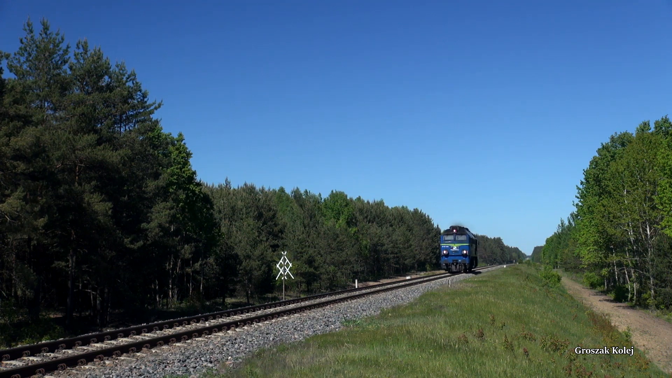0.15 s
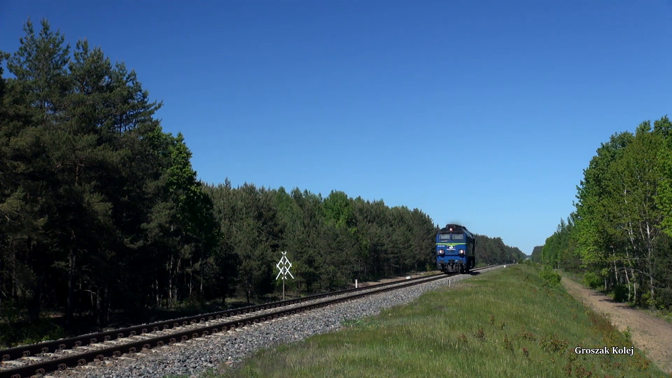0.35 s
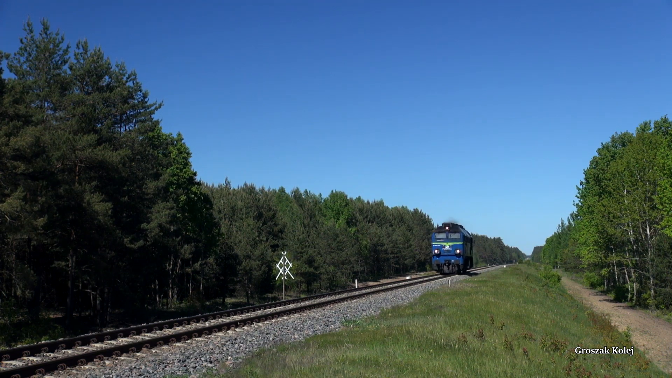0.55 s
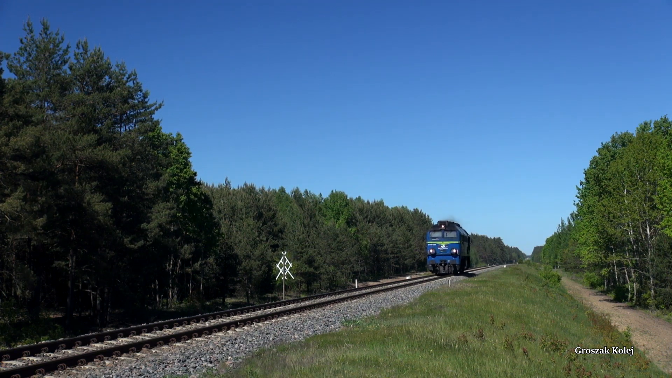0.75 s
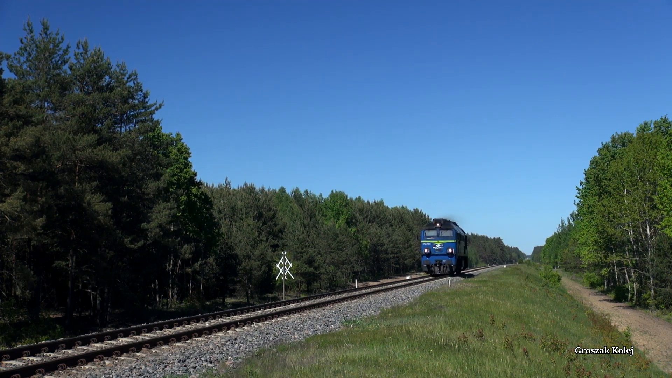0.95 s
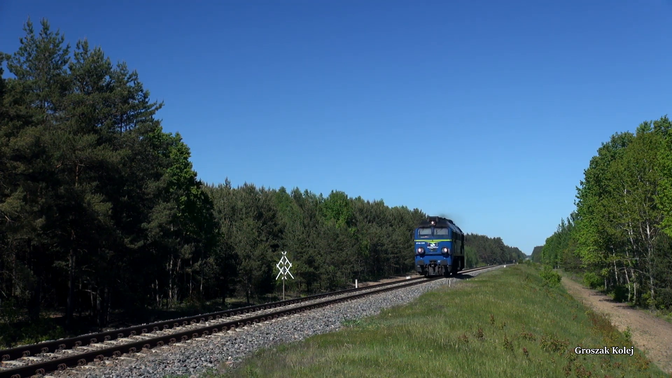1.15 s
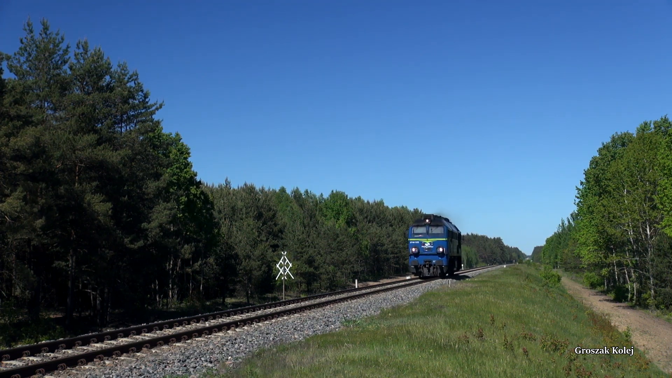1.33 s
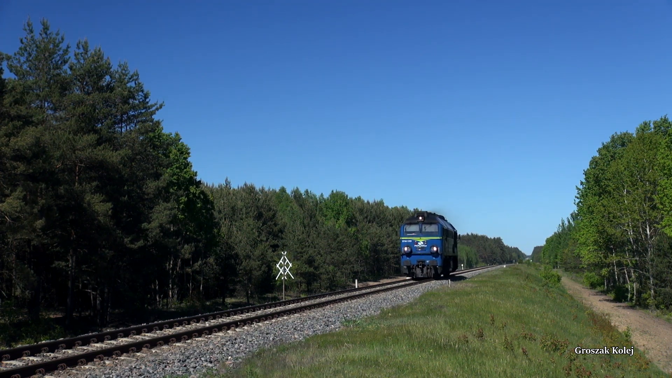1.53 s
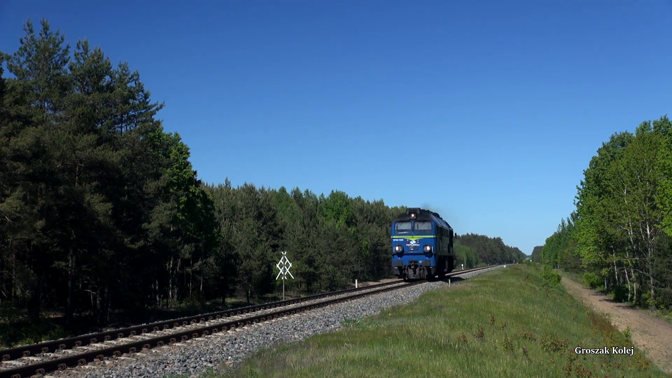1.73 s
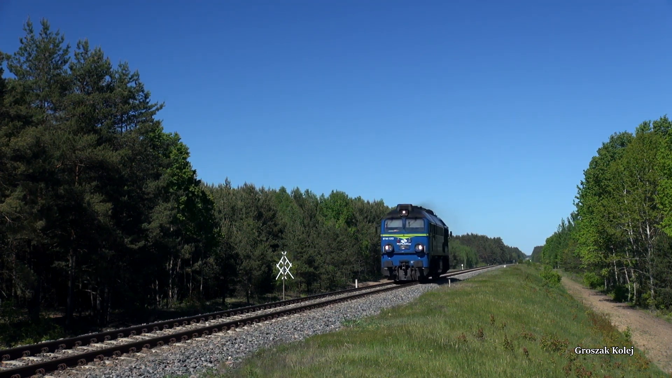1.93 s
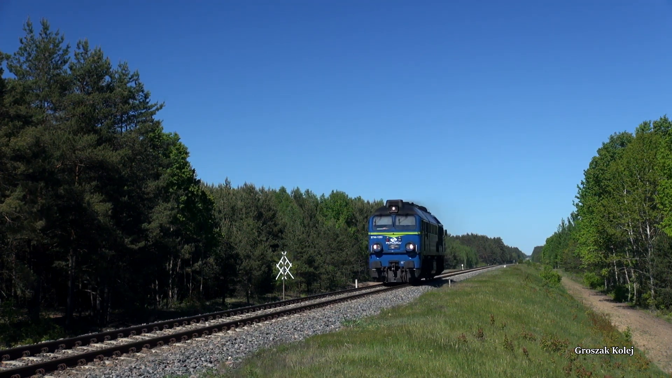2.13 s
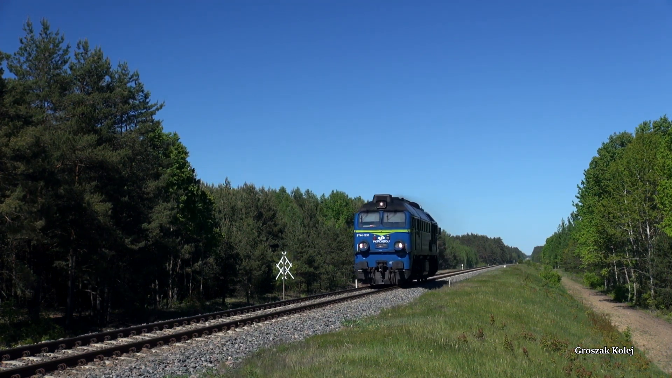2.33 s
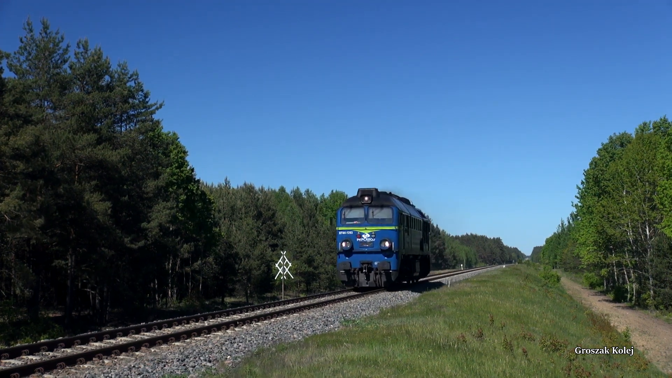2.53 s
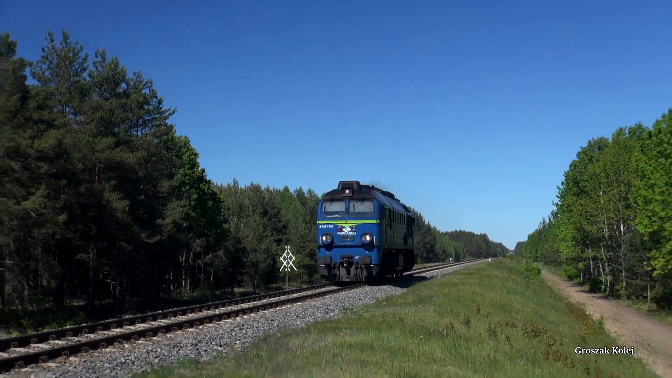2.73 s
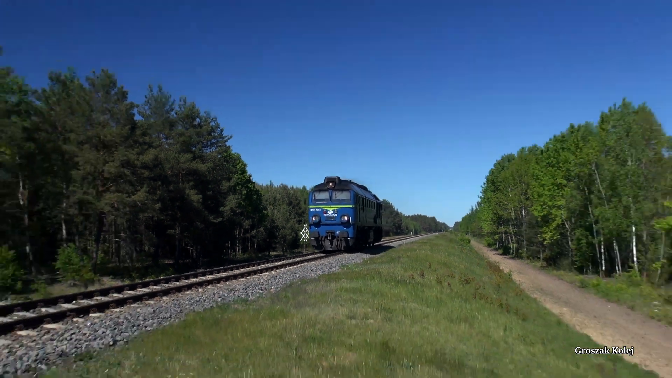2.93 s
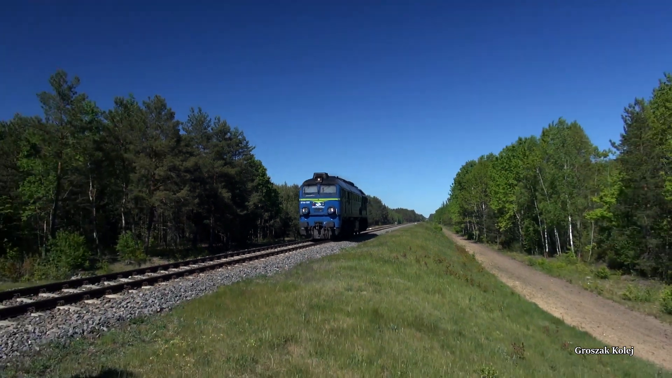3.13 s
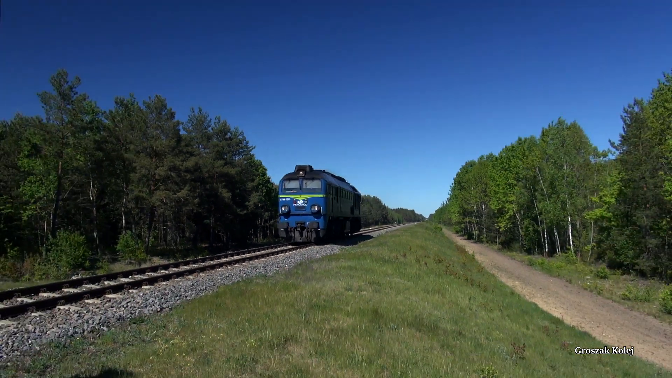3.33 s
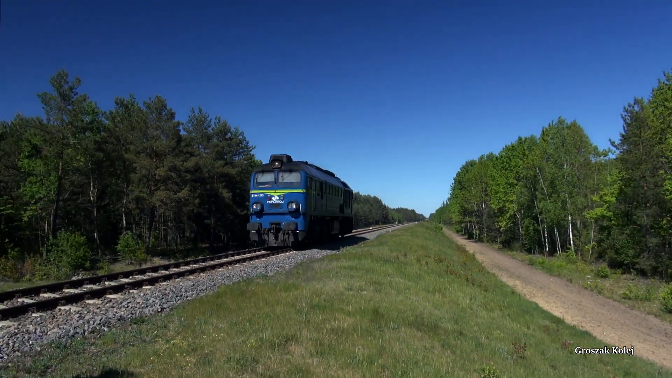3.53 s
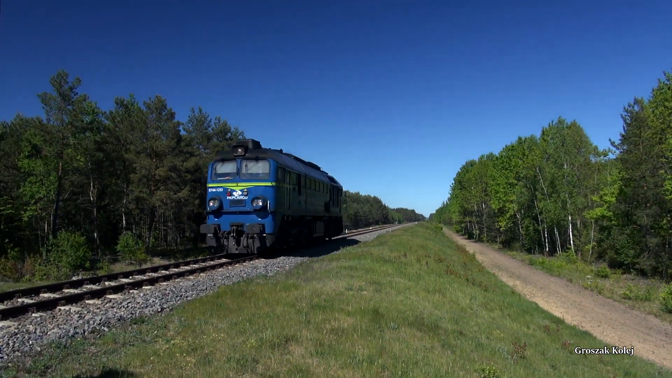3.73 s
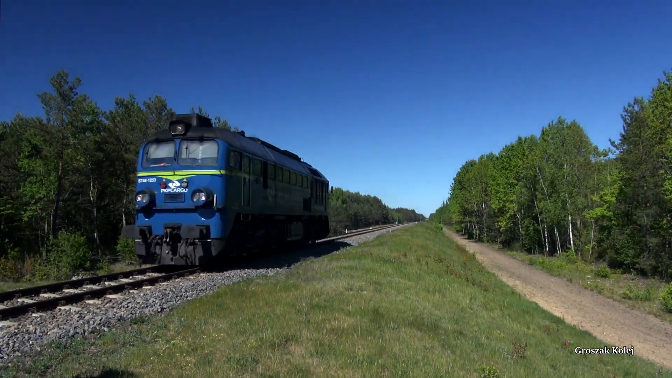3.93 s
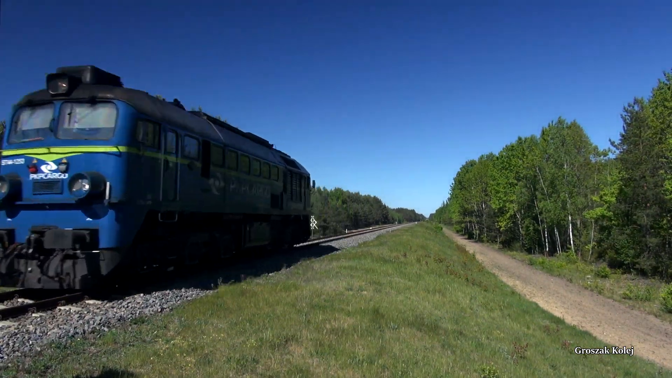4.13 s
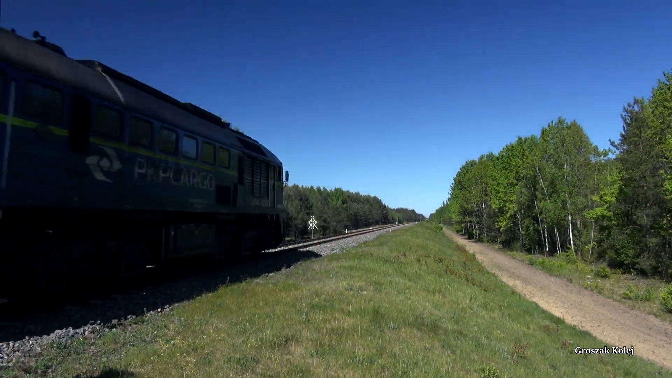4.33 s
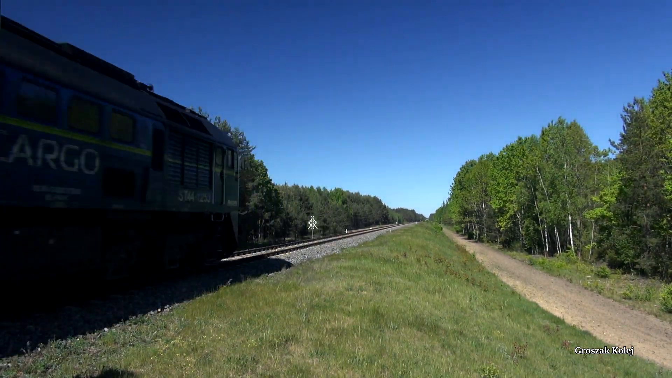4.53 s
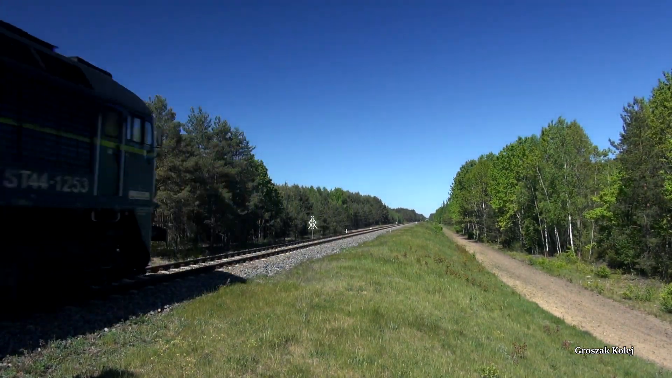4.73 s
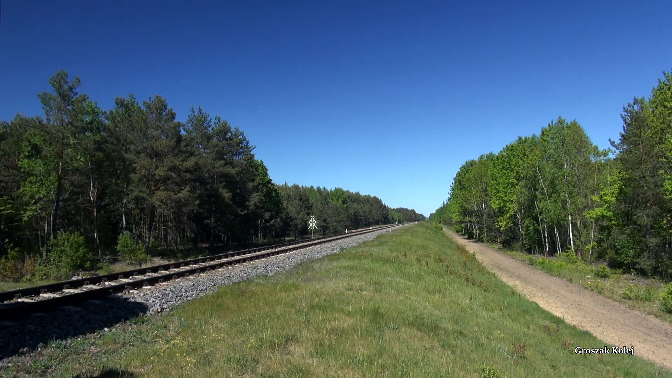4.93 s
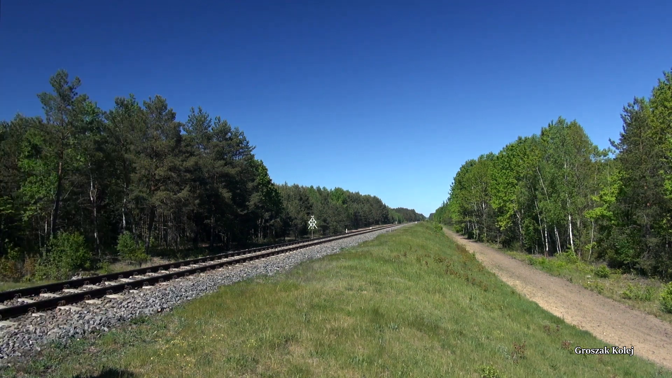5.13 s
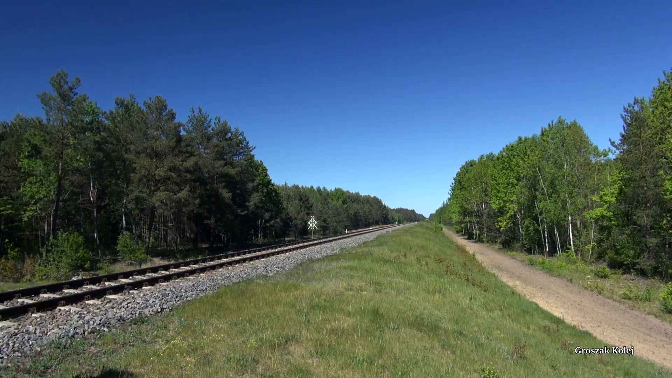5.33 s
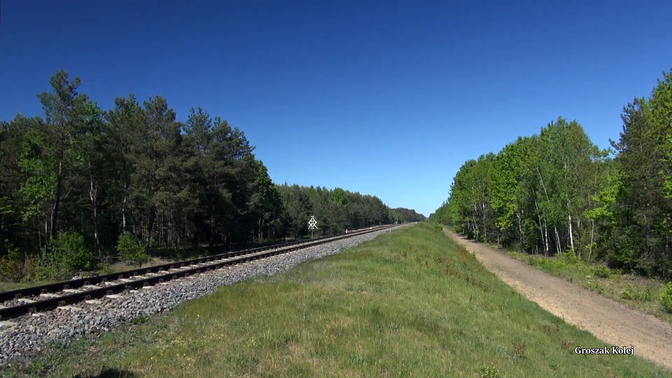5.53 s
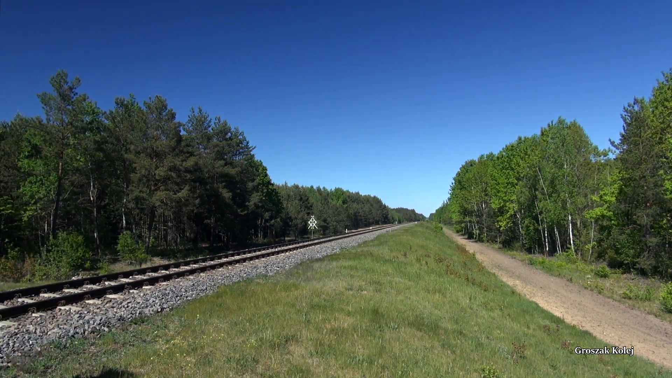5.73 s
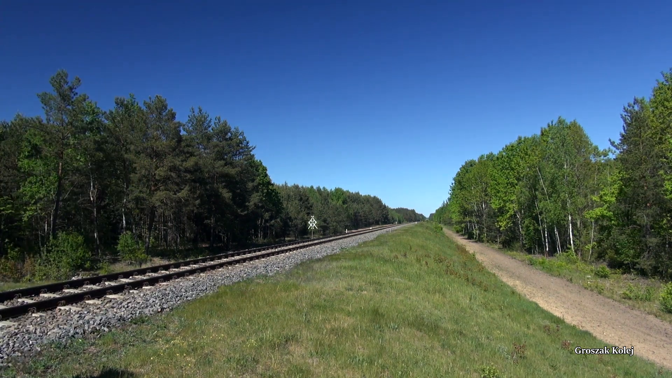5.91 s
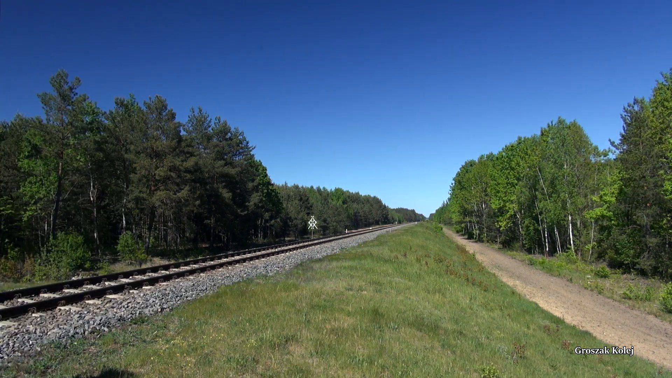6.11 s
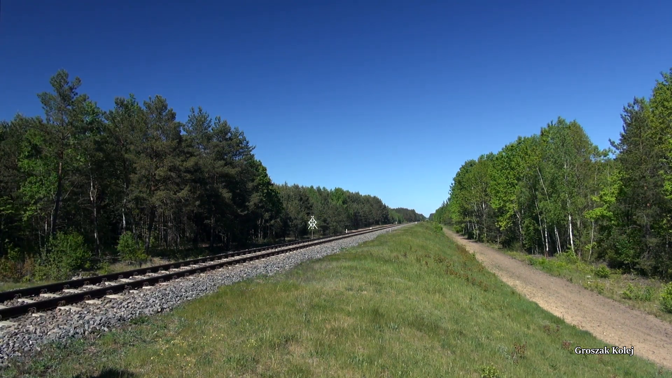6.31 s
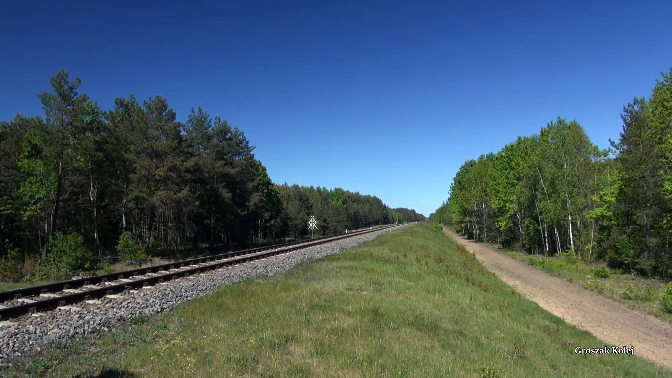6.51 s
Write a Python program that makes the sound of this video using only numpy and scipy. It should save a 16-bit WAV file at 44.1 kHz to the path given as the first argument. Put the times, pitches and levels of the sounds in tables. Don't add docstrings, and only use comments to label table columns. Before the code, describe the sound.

Open air beside a railway through forest, heard by a nearby stereo camera microphone. From 0 to 2.5 s it is quiet: soft high leaf hiss, tiny lens ticks on the right, and a distant, ringing wheel-and-rail hiss slowly growing, with faint flicks along the rail. Around 2.5 s come soft creaks of the camera body, and a low, uneven diesel throb emerges, heavier on the right. The roar thickens with a rough gear whine; a loud plastic creak snaps at 3.6 s. From 4.3 to 5.1 s the lone locomotive passes very close: dense low-mid roar, hard thudding wheel knocks, short metal clangs, pulsing engine, pitch sinking. Further bangs hit near 5.4 and 5.55 s as the roar collapses rapidly. By 6 s only receding rumble, weak knocks, humming and thinly singing rail, a tiny bird note and leaf hiss remain until 6.6 s.

```python
import sys
import numpy as np
from scipy import signal
from scipy.fft import rfft, irfft, next_fast_len
from scipy.io import wavfile
from scipy.ndimage import map_coordinates

SR = 44100
rng = np.random.default_rng(int(sys.argv[2]) if len(sys.argv) > 2 else 0)


def decibels_to_gain(level_db):
    exponent = np.asarray(level_db, float) / 20
    return 10 ** exponent


def int16_out(signal):
    q = np.round(np.clip(np.atleast_2d(signal).T, -1, 1) * 32767)
    wavfile.write(sys.argv[1], SR, q.astype(np.int16))


N = 294162
T = np.arange(N) / SR
HZ = np.fft.rfftfreq(next_fast_len(N), 1 / SR) + 1e-3
SPEED_M_S, SOUND_M_S = 23.4, 343

# (time [s], place [0 distant, 1 nearing, 2 nose alongside, 3 tail alongside, 4 gone])
PLACE = [(0, 0.36), (1.2, 0.48), (2.6, 0.88), (3.3, 1.27), (3.9, 1.62), (4.3, 1.97), (4.55, 2.42),
         (4.8, 2.5), (5.15, 3.146), (5.4, 3.39), (5.75, 4.05), (6.67, 4.23)]


def rms_one(x):
    return x / np.sqrt(np.mean(x ** 2) + 1e-20)


def in_time(rows):
    s, *columns = np.transpose(rows)
    return [np.interp(T, s, c) for c in columns]


def over_hz(rows):
    hz, *columns = np.transpose(rows)
    return [np.interp(np.log(HZ), np.log(hz), c) for c in columns]


def drift(rate_hz):
    knots = rng.standard_normal(400)
    return np.interp(T, T[::64], map_coordinates(knots, [T[::64] * rate_hz], order=3))


def ring(x, hz, t60_s):
    r, w = decibels_to_gain(-60 / (t60_s * SR)), 2 * np.pi * hz / SR
    return signal.lfilter([0, np.sin(w)], [1, -2 * r * np.cos(w), r * r], x)


def filtered(x, order, hz, kind):
    return signal.sosfilt(signal.butter(order, hz, kind, fs=SR, output="sos"), x)


def doppler_turns(hz, along_m, track_m):
    approach = along_m / np.hypot(along_m, track_m)
    return np.cumsum(hz / (1 + SPEED_M_S / SOUND_M_S * approach)) / SR


def swells(rows):
    return sum(db * np.exp(-((T - s) / length_s) ** 2) for s, db, length_s in rows)


def part_levels():
    # (level alongside [dB], loss ahead [dB/decade], loss behind [dB/decade],
    # loss to microphone back [dB], ground loss [dB/m])
    parts = [
        (-25, 29.1, 19.2, 5.6, -0.021),
        (-14.5, 26.96, 23.6, 5, 0.016),
        (-21.5, 13.7, 5.7, 20.3, 0.048),
        (-26.5, 28.1, 23, 9.3, -0.012),
    ]
    # (first [s], last [s])
    bogies_s = (4.682, 4.928)
    turn_s = [5.4, 5.5, 5.333, 5.284]
    turn_takes_s = [0.21, 0.11, 0.18, 0.18]
    # (time [s], extra level [dB], length [s])
    booms = [(.15, 5, 0.052), (1.07, 5, 0.064), (1.6, -7, 0.13), (2.6, 3.5, 0.17), (4.2, 4.5, 0.093),
             (5.9, 2.5, .06), (6.5, 3.5, 0.17), (.72, 8.5, 0.055), (.94, 4.5, 0.12), (2.13, 6, .2),
             (2.93, -2, 0.044), (3.44, 6, 0.029), (3.92, -1, 0.022), (4.66, -1, 0.033), (4.85, 4, 0.043),
             (5.26, 7.5, 0.05), (5.52, 5, .06)]
    # (time [s], extra level [dB], length [s])
    surges = [(3.1, 1.5, 0.058), (3.57, 2, 0.027), (3.98, 3, 0.026), (4.46, -1, 0.11), (4.72, -0.5, 0.016),
              (4.85, -2, 0.028), (5.07, 2, 0.029), (5.18, 1.5, 0.16), (1.7, 2, 0.28), (3.75, 2.5, 0.14),
              (4.33, 3, 0.23), (5.38, 1.5, 0.057), (6.02, 2, 0.076)]
    # (time [s], extra level [dB], length [s])
    flares = [
        (1.3, 0.5, .1),
        (2.5, 0.5, 0.28),
        (3.0, 1, .06),
        (4.22, 1, 0.062),
        (4.35, 2, 0.17),
        (4.7, 1, 0.16),
        (5.11, 0.5, 0.016),
        (5.2, 1.5, 0.026),
        (6.0, 1, 0.16),
        (6.55, 3, 0.27),
    ]
    track_m, rear_lighter_db = 7.29, 3
    first, last = bogies_s
    ahead_m = np.hypot(SPEED_M_S * np.maximum(first - T, 0), track_m)
    behind_m = np.hypot(SPEED_M_S * np.maximum(T - last, 0), track_m)
    rear_db = rear_lighter_db * np.clip((T - first) / (last - first), 0, 1)
    levels = []
    for (db, ahead_db, behind_db, back_db, ground_db), s, takes_s in zip(parts, turn_s, turn_takes_s):
        turned = (1 + np.tanh((T - s) / takes_s)) / 2
        spread_db = ahead_db * np.log10(ahead_m / track_m) + behind_db * np.log10(behind_m / track_m)
        levels.append(db - spread_db - back_db * turned - ground_db * (ahead_m - track_m) - rear_db)
    flare_db = swells(flares)
    return [levels[0] + swells(booms), levels[1] + swells(surges), levels[2] + flare_db, levels[3] + 0.97 * flare_db]


def forest():
    # (frequency [Hz], density [dB/Hz])
    leaves = [(2940, -48), (5000, -25), (5870, -22), (7550, 2), (7950, -3), (8260, -31), (9980, -19),
              (10800, -6), (11800, -2), (15500, -14)]
    # (time [s], length [s], pitch [Hz], level [dB])
    bird = (6.012, .03, 2800, -41)
    leaves_db = -71
    noise = rfft(rng.standard_normal((2, next_fast_len(N))))
    mid, side = irfft(noise * decibels_to_gain(over_hz(leaves)[0]) * (HZ > 5000))[:, :N]
    hiss = decibels_to_gain(leaves_db - 3.0) * rms_one(np.array([mid + .5 * side, mid - .5 * side]))
    s, length_s, hz, db = bird
    swell = np.sin(np.pi * np.clip((T - s) / length_s, 0, 1))
    note = decibels_to_gain(db) * swell * np.sin(2 * np.pi * hz * T)
    return hiss + note * [[-.6], [2]]


def camera():
    # (time [s], peak [dB], length [ms], brightest part [dB])
    creaks = [
        (2.47, -32.5, 4.7, -51),
        (2.6322, -30, 3.6, -70),
        (3.5581, -9.5, 6, -32),
    ]
    # (time [s], peak [dB])
    lens_ticks = [(0.0992, -65), (0.7996, -64), (0.8245, -62), (1.0685, -65), (1.2136, -63), (1.5534, -61),
                  (1.7898, -65), (5.1617, -56)]
    crackle, bright, clicks = np.zeros((3, N))
    for s, db, ms, bright_db in creaks:
        age_ms = np.arange(round(ms * SR / 500)) / SR * 1000
        burst = rng.standard_normal(900)[:len(age_ms)] * np.exp(-(age_ms / ms) ** 4)
        burst[12:16] += 5
        at = round(s * SR)
        crackle[at:at + len(age_ms)] += decibels_to_gain(db - 20.5) * burst
        bright[at:at + len(age_ms)] += decibels_to_gain(bright_db + 3) * burst
    for s, db in lens_ticks:
        clicks[round(s * SR)] = decibels_to_gain(db - 17)
    # gain, Hz, t60 s
    modes = [(.45, 2400, .0052), (.55, 3100, .0052), (.1, 3920, .006), (.18, 4350, .0072),
             (.17, 1800, .0034), (.12, 7300, .0035), (.081, 5600, .0026), (.08, 10900, .003)]
    shell = sum(gain * ring(crackle, hz, t60_s) for gain, hz, t60_s in modes)
    shell = filtered(shell, 2, 1500, "high") * decibels_to_gain([[-3.5], [3]])
    centre = 0.33 * ring(crackle, 9100, 0.0022)
    air = filtered(bright, 4, [13200, 16600], "band") * decibels_to_gain([[-6], [8]])
    thin = ring(ring(clicks, 13000, .006), 13000, .006) * [[0], [2]]
    return shell + centre + air + thin


def rail_patter(per_s=45, level_db=-13):
    struck = rng.random((2, N)) < per_s / SR
    sizes = decibels_to_gain(6.8 * np.minimum(rng.exponential(1, (2, N)), 3)) * struck
    beads = 0
    for x, hz in zip(sizes, (1000, 1400)):
        beads = beads + rms_one(ring(ring(x + 1e-18, hz, 0.021), hz, 0.021))
    ahead = np.clip(2 - in_time(PLACE)[0], 0, 1)
    return decibels_to_gain(part_levels()[2] + level_db) * ahead * beads * decibels_to_gain([[-.5], [.5]])


def rail_hum(hum_db=-9, sing_db=-10, left_gone_db=-8, wander_rad=2.87, waver_db=3.0):
    hum_hz, sing_hz = 387.8, 1452
    gone = np.clip(in_time(PLACE)[0] - 3, 0, 1)
    _, wheel_db, rail_db, _ = part_levels()

    def wavering(hz):
        return decibels_to_gain(waver_db * drift(13.0)) * np.sin(2 * np.pi * hz * T + wander_rad * drift(11.0))

    hum = wavering(hum_hz) * decibels_to_gain(wheel_db + hum_db + 3.5 * gone) * np.clip(T / 4.5, 0, 1)
    sing = wavering(sing_hz) * gone * decibels_to_gain(rail_db + sing_db)
    left = decibels_to_gain(left_gone_db * gone)
    return hum * 2 / (1 + left) * np.array([left, np.ones(N)]) + sing * [[-.6], [2.6]]


def gears():
    rest_hz, width_hz, level_db = 566, 18, -6.5
    abreast_s, ends_s, fades_s = 4.5, 4.66, 0.14
    phase = 2 * np.pi * doppler_turns(rest_hz, SPEED_M_S * (T - abreast_s), 4.0)
    whine = drift(width_hz) * np.sin(phase) + drift(width_hz) * np.cos(phase)
    heard = np.clip((T - 2.4) / 0.98, 0, 1) * (1 - np.tanh((T - ends_s) / fades_s)) / 2
    return decibels_to_gain(part_levels()[1] + level_db) * heard * whine * decibels_to_gain([[-.5], [.5]])


def clangs(cycles=15.4):
    # (time [s], level [dB], pitch [Hz], length [s])
    strikes = [(4.303, -32, 1650, .02), (4.356, -37, 3200, 0.043), (4.37, -30, 2340, 0.033),
               (4.415, -28.5, 1650, 0.033), (4.557, -34, 2380, .025), (4.659, -25, 2450, 0.022),
               (4.62, -40.5, 3100, .02), (4.71, -28, 1600, .02), (4.789, -29, 1650, .015),
               (4.835, -28, 2600, .02), (4.871, -29, 1600, 0.027), (4.921, -33, 3060, 0.032),
               (4.928, -30, 1650, 0.016), (5.0, -33, 2190, .015), (5.066, -34, 2550, .012),
               (5.094, -37, 2500, .012), (5.096, -30.5, 2250, .025), (5.186, -35, 2930, .02),
               (1.304, -36, 1400, 0.011), (4.62, -22, 383, 0.025), (4.705, -14, 374, 0.021),
               (4.846, -18, 263, 0.043), (5.109, -19, 360, .03), (4.48, -14, 530, 0.03),
               (4.308, -24, 586, .025), (4.42, -30, 140, .05), (4.6, -28.5, 172, 0.052),
               (4.9, -29.5, 149, 0.044), (5.112, -32.5, 111, .04), (4.3, -25, 345, .03),
               (4.4, -24, 392, .03), (5.65, -53, 3200, .05), (6.12, -52, 1500, 0.036), (6.55, -48, 105, .06),
               (5.95, -45, 105, .04), (4.4, -24, 580, .03)]
    half = 4000
    out, age_s = np.zeros(N), np.arange(-half, half) / SR
    for s, db, hz, length_s in strikes:
        noise = rng.standard_normal(len(age_s))
        swell = np.exp(-(age_s / length_s) ** 2)
        rung = ring(ring(noise, hz, cycles / hz), hz, cycles / hz) * swell
        at = round(s * SR) - half
        out[at:at + len(age_s)] += decibels_to_gain(db) * rung * np.sqrt(np.sum(swell ** 2) / np.sum(rung ** 2))
    return out * decibels_to_gain([[-1.2], [1.1]])


def knocks(share_db=-2):
    # (time [s], peak [dB], pitch [Hz])
    hits = [(1.426, -27.5, 990), (1.428, -31, 1384), (2.769, -30, 830), (3.975, -15, 570),
            (4.057, -20, 580), (4.317, -6, 542), (4.348, 1, 530), (4.349, -15, 900), (4.373, 4.5, 393),
            (4.474, -10, 540), (4.534, -6, 433), (4.606, -2, 417), (4.711, 3, 370), (5.354, -6, 358),
            (5.396, -2.5, 380), (5.559, -8, 380), (5.961, -24, 650), (5.962, -36, 1020), (5.469, -13, 374),
            (5.646, -23, 401), (5.702, -15, 412), (5.802, -30, 590), (6.027, -26, 400), (6.065, -23, 380),
            (6.203, -19.5, 380), (6.34, -22.5, 380), (6.432, -30, 377), (6.469, -28, 385),
            (6.607, -26, 380)]
    out, age_s = np.zeros(N), T[:2000]
    for s, db, hz in hits:
        push = np.exp(-((age_s - .003) / 0.0017) ** 2)
        contact = np.sin(2 * np.pi * hz * age_s) * push * hz / SR * 4
        at = round(s * SR)
        out[at:at + 2000] += decibels_to_gain(db + share_db) * ring(contact, hz, 0.0063)
    return out * decibels_to_gain([[-1.5], [1.0]])


def engine(rumble_db=-14, left_db=-21):
    # (time [s], level [dB])
    throb = [(0.0, -82), (0.82, -67), (1.28, -71), (1.71, -57), (1.88, -51), (2.56, -43), (2.69, -36),
             (2.86, -33.5), (3.16, -35.5), (3.73, -32), (4.12, -32.5), (4.64, -28), (4.94, -32.5),
             (5.55, -48), (5.72, -45), (5.94, -45.5), (6.67, -42.5)]
    # (multiple of crank rate [-], level [dB], phase at the mark [turns])
    crank_orders = [
        (11, -3, .70),
        (12, 0, .33),
        (13, -8, .39),
        (14, -16, .56),
        (17, -17, .91),
        (18, -13, .31),
    ]
    crank_hz, mark_s, abreast_s, track_m = 4.747, 3.2, 4.75, 10.7
    along_m = SPEED_M_S * (T - abreast_s)
    turns = doppler_turns(crank_hz, along_m, track_m)
    turns -= turns[round(mark_s * SR)]
    lines = 0
    for order, db, start in crank_orders:
        lines = lines + decibels_to_gain(db + drift(2.92)) * np.sin(2 * np.pi * (order * turns + start))
    rumble = filtered(rng.standard_normal((2, N)), 2, [32, 85], "band")
    right = rms_one(lines) + decibels_to_gain(rumble_db) * rms_one(rumble[0])
    side = -np.tanh(along_m / 11.0)
    left = decibels_to_gain(left_db) * (right * side + 0.18 * rms_one(rumble[1]))
    return 2 * decibels_to_gain(in_time(throb)[0]) * np.array([left, right])


def place_filters(colour, rings, image):
    boost_db = sum(db / (1 + (2 * (HZ - hz) / width_hz) ** 2) for hz, width_hz, db in rings)
    centre = decibels_to_gain(over_hz(colour)[0] + boost_db)
    rows = [(hz, db, alike * np.cos(lead), alike * np.sin(lead)) for hz, db, alike, lead in image]
    left_db, along, across = over_hz(rows)
    left = decibels_to_gain(left_db)
    right = 2 * centre / np.sqrt(1 + left ** 2 + 2 * left * along)
    to_left = right * left * (along + 1j * across)
    stray_left = right * left * np.sqrt(1 - along ** 2 - across ** 2)
    return centre, to_left, stray_left, right


def rolling(flutter_db=.15, grit_db=.45):
    # (frequency [Hz], density [dB/Hz])
    colours = [
        [(44, -53), (75, -37), (231, -19), (321, -20), (533, -2.5), (595, -7), (987, -12), (1130, -21),
         (1400, -24), (2040, -18.5), (2230, -11), (3780, -23.5), (7490, -43), (14500, -34)],
        [(44, -39), (75, -6), (177, -15.5), (374, -10), (447, -4), (608, -1.5), (709, -12), (987, -13),
         (1180, -19), (2000, -29), (2330, -18.5), (3620, -30.5), (9130, -43.5), (14500, -53.5)],
        [(44, -41), (75, -8), (189, -14.5), (294, -4), (383, -2), (457, -4), (582, -2), (725, -9.5),
         (904, -6.5), (1310, -17), (2330, -30.5), (5750, -43.5), (9130, -50), (14500, -70.5)],
        [(44, -46), (75, -16.5), (177, -5.5), (226, -6), (257, -5), (321, -4.5), (409, -2), (679, -10.5),
         (865, -8), (1370, -19), (2540, -25), (3870, -33), (8180, -44.5), (14500, -64.5)],
        [(44, -15), (75, -7), (221, -13.5), (383, -4.5), (545, -13.5), (635, -8), (1100, -28.5), (1470, -27.5),
         (1830, -33), (2000, -27.5), (2380, -27), (3170, -37), (9540, -50.5), (14500, -55.5)],]
    # (frequency [Hz], width [Hz], boost [dB])
    rings = [
        [(465, 27, 5), (1050, 82, 9.5), (1360, 210, 17.5), (2210, 58, 4), (4700, 580, -17), (5560, 800, -8),
         (7260, 1350, 22.5)],
        [(374, 81, 11.5), (580, 79, -0.5), (985, 39, 7.5), (1440, 81, 2.5), (2200, 78, 1), (4690, 670, 7),
         (5730, 550, -3.5), (6750, 420, 6.5), (9130, 340, 6)],
        [(393, 51, 9.5), (579, 180, 7), (900, 400, 5), (2470, 300, 5.5), (1650, 77, 3), (3180, 200, 4),
         (4580, 410, 4.5), (8900, 1200, 5)],
        [(265.3, 16, 12.5), (380, 190, 7), (490, 58, 2), (2330, 270, 2.5), (1600, 100, 3), (2970, 150, 2.5),
         (4500, 430, 2.5)],
        [(393, 29, 7), (650, 26, 6), (990, 94, 10), (1190, 170, -4), (1427, 65, 6.5), (2230, 300, 2.5),
         (1820, 200, 1.5), (4600, 2200, -5.5), (6540, 420, 3.5)],
    ]
    band_edges_hz = [280, 800, 2000]
    # (frequency [Hz], left minus right [dB], likeness [0-1], left phase lead [rad])
    far_image = [(125, -13.5, 0.59, 0.0), (250, -7.9, 0.85, 0.0), (400, -4.1, 0.98, 0.0),
                 (800, -3.1, 0.98, 0.0), (1100, 0.2, 0.99, 0.0), (1500, -2.6, 0.96, 0.0),
                 (2400, -5.0, 0.97, 0.0), (3500, -7.4, 0.98, 0.0), (5000, -6.5, 0.92, 0.1),
                 (6000, -2.4, 0.67, 0.4), (7000, -0.9, 0.8, 0.2), (9000, -0.1, 0.68, 0.7),
                 (11000, -0.2, 0.41, 0.9)]
    nose_image = [(125, -13.8, 0.88, 0.0), (250, -2.3, 0.99, 0.0), (400, -0.4, 0.99, 0.0),
                  (800, -0.9, 0.99, 0.0), (1500, -1.9, 0.98, 0.0), (2400, -2.8, 0.98, 0.0),
                  (3500, -3.0, 0.99, 0.0), (7000, -1.6, 0.89, 0.3), (9000, -0.8, 0.86, 0.6),
                  (12000, -1.9, 0.53, 0.9)]
    tail_image = [(125, -21.5, 0.32, 0.3), (250, -0.7, 0.99, 0.0), (400, 0.1, 1.0, 0.0),
                  (800, -0.3, 0.99, 0.0), (1500, -2.7, 0.97, 0.0), (2400, -3.8, 0.94, 0.0),
                  (3500, -4.1, 0.93, 0.0), (7000, -1.3, 0.82, 0.2), (9000, 0.3, 0.73, 0.4),
                  (12000, -2.3, 0.32, 1.0)]
    gone_image = [(125, -9.2, 0.96, 3.1), (220, -11.5, 0.85, 3.1), (400, -8.2, 0.98, 0.0),
                  (640, -9.0, 0.93, 0.0), (1000, -12.0, 0.76, 3.1), (1220, -3.9, 0.94, 3.1),
                  (1460, -9.4, 0.73, 3.1), (1800, -5.1, 0.95, 3.1), (2300, -8.3, 0.96, 3.1),
                  (3300, -4.6, 0.96, 3.1), (4600, -2.8, 0.95, 3.1), (6500, -1.5, 0.45, 2.1),
                  (9000, 0.9, 0.57, 1.5), (11000, -1.1, 0.43, 1.1)]
    images = [far_image, far_image, nose_image, tail_image, gone_image]
    size = next_fast_len(N)
    shared, stray = rfft(rng.standard_normal((2, size))) * np.sqrt(len(HZ) / size)
    place = in_time(PLACE)[0]
    steps = [1 / (1 + (edge / HZ) ** 8) for edge in band_edges_hz]
    masks = -np.diff([np.ones_like(HZ), *steps, np.zeros_like(HZ)], axis=0)
    bands = np.zeros((len(masks), 2, N))
    for k, tables in enumerate(zip(colours, rings, images)):
        centre, to_left, stray_left, to_right = place_filters(*tables)
        pair = np.array([to_left * shared + stray_left * stray, to_right * shared])
        weight = np.clip(1 - abs(place - k), 0, 1)
        for band, mask in zip(bands, masks):
            power = np.mean((centre * mask) ** 2) / 2
            band += weight * irfft(pair * mask, size)[:, :N] / np.sqrt(power)
    bands[-1] *= decibels_to_gain(grit_db * drift(50.0))
    together = drift(11.0)
    return sum(band * decibels_to_gain(db + flutter_db * (together + drift(22.03))) for band, db in zip(bands, part_levels()))


def scene():
    # (left [Hz], right [Hz])
    top_hz = [11700, 15300]
    steady = rfft(forest() + rail_patter() + rolling(), next_fast_len(N))
    tops = [1 / (1 + (HZ / hz) ** 80) for hz in top_hz]
    steady = irfft(steady * tops)[:, :N]
    return steady + camera() + rail_hum() + gears() + clangs() + knocks() + engine()


def band_limit(x):
    return signal.sosfilt(signal.butter(12, 16380, fs=SR, output="sos"), x)


def record(dry):
    rounded = .98 * np.tanh(dry / .98)
    mix = signal.sosfilt(signal.cheby2(10, 60, 16500, fs=SR, output="sos"), rounded)
    return band_limit(mix)


dry = scene()
out = record(dry)
int16_out(out)
```